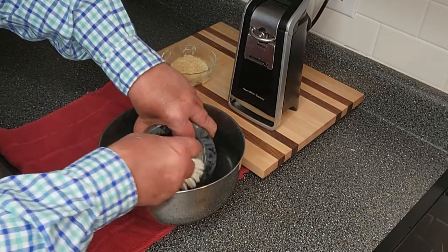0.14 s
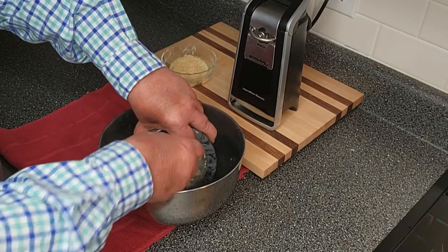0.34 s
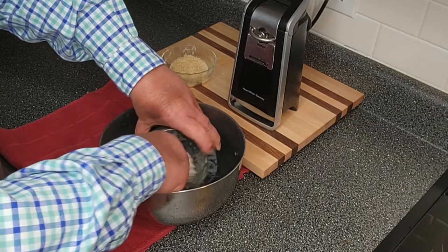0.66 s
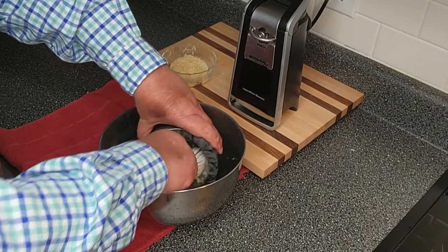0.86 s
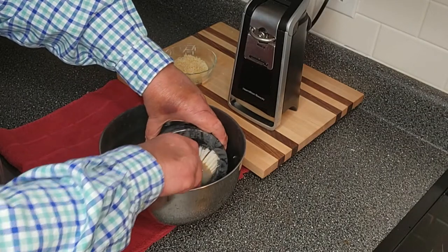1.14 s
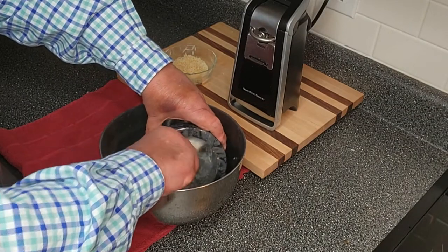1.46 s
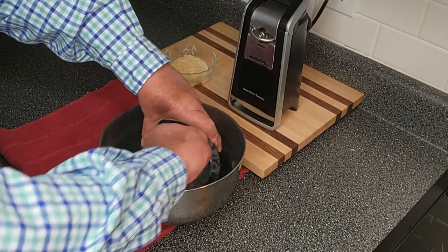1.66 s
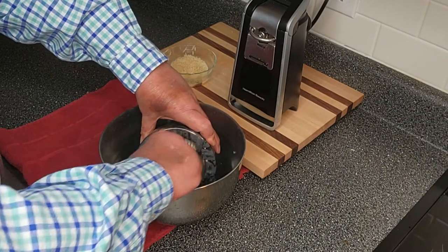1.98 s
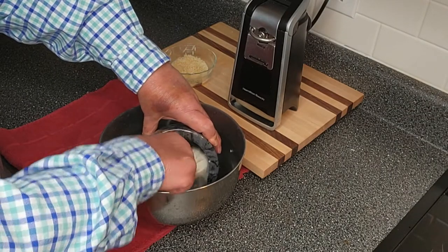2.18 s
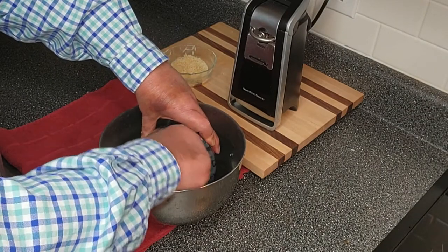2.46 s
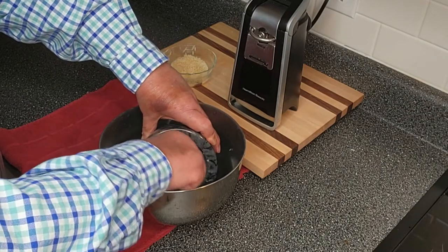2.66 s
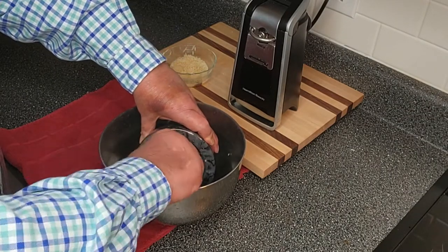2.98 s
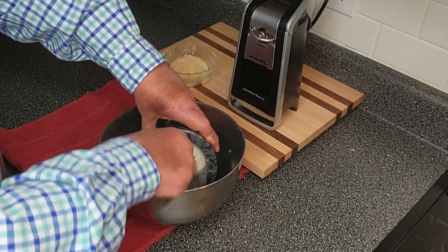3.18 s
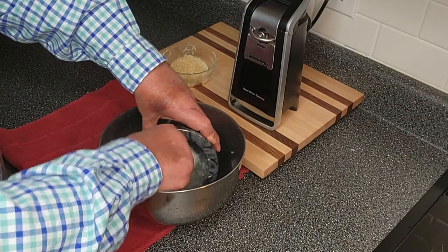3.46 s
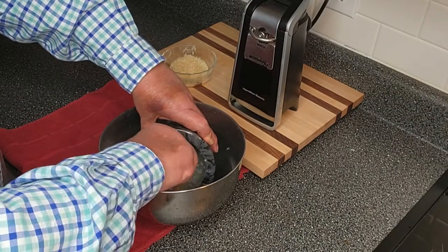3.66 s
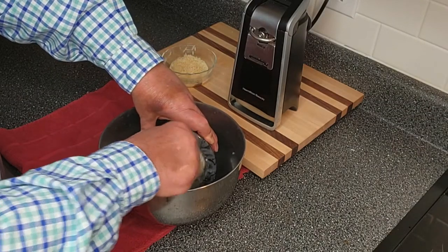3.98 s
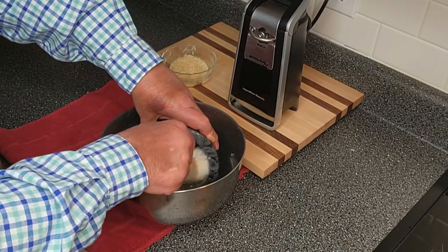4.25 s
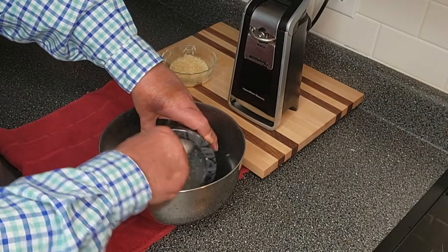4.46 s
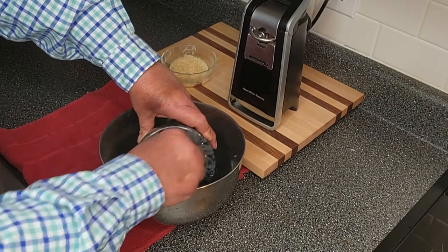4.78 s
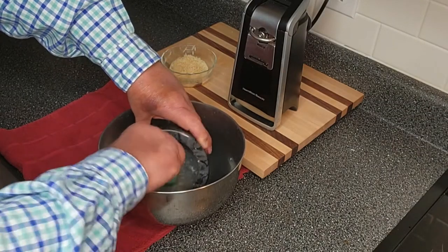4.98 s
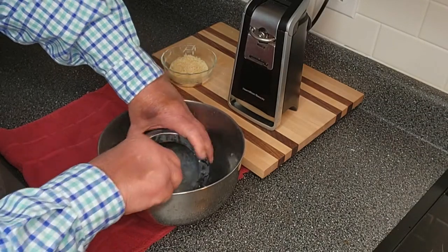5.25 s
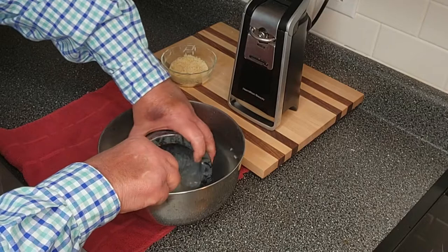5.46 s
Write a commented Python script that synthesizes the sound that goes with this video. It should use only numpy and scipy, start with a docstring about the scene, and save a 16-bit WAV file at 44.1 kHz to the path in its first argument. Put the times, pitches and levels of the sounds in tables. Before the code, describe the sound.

Irregular scratching of bristles on rough stone, broken by ringing taps, small pops and low grinding in a quiet kitchen.

```python
"""Scrubbing a stone bowl

A small tiled kitchen, a stereo microphone at the counter, its left port facing a stone bowl held in a
steel basin. A nylon brush rasps over the rough stone in short strokes and sets the bowl ringing; the
brush head knocks and stiff bristles flick free, and the room answers these two. The bowl grinds and
bumps against the basin and shakes the counter. Short pitched pops and ticks, many on the knocks and
flicks, and a small rising bubble or two sound over the quiet room air."""
import sys
import numpy as np
from scipy import signal
from scipy.fft import rfft, irfft, next_fast_len
from scipy.io import wavfile
from scipy.ndimage import uniform_filter1d

SR = 44100
rng = np.random.default_rng(int(sys.argv[2]) if len(sys.argv) > 2 else 0)


def dump_mix(stems):
    """Bounce the given channels to the path in sys.argv[1] as a 16-bit WAV at rate SR."""
    frames = np.atleast_2d(stems).T  # one column per channel
    limited = np.clip(frames, -1, 1)  # hard clip at full scale
    pcm = np.round(limited * 32767).astype(np.int16)
    wavfile.write(sys.argv[1], SR, pcm)


N = 247842
TIME = np.arange(N) / SR

# Brush strokes: full pressure t/s, rise/s, hold/s, rasp/dB, fizz/dB over rasp, hollow f/Hz,
# hollow/dB over rasp, bent tips/dB over rasp, wall ring/dB, wall f/Hz, rim ring/dB, rim f/Hz, pan/dB
# (pan is always left minus right)
STROKES = [(0.0, 0.065, 0.028, -47.5, -17.0, 3380.0, -17, -18, -49.5, 1270.0, -58, 1630.0, -4),
           (0.114, 0.074, 0.014, -55, -20, 2200.0, -13, -12, -58.5, 1280, -65, 2120, -3),
           (0.151, 0.0063, 0.032, -33, -15, 2250, -14, -14.0, -58, 1200.0, -49, 2400, -5),
           (0.21, 0.03, 0.03, -35.5, -18, 3390, -9.5, -14, -50.5, 1120, -46, 2280, -4),
           (0.332, 0.04, 0.042, -53, -17, 3300, -10, -16, -61.5, 1200, -58.5, 2310.0, -4),
           (0.547, 0.079, 0.033, -43.0, -22, 2500, -30, -14.0, -48.5, 876, -51.0, 2600.0, -4),
           (0.788, 0.067, 0.019, -61, -34, 2480.0, -16, -16, -57.5, 875, -77, 2240, -4),
           (0.905, 0.02, 0.026, -85, -13, 2500, -8, -17, -53, 1210, -62, 2500, -6),
           (0.947, 0.031, 0.0084, -52.5, -10, 2560, 0, -30, -66, 1270, -45.5, 2270, -4),
           (1.051, 0.088, 0.038, -53.5, -9.5, 3420, -8, -29, -59.5, 1120, -59.5, 2050, -2),
           (1.19, 0.055, 0.053, -63, -7, 5050, -7, -19, -63, 920.0, -66.5, 2050, -3),
           (1.397, 0.085, 0.0081, -59, 0.5, 4810.0, -10, -4, -77, 1340, -66, 2670, -4.5),
           (1.536, 0.14, 0.001, -48.5, -1, 4670, -8, -8.5, -58, 1330, -67, 2820.0, -2),
           (1.623, 0.06, 0.052, -49.5, -3, 2180, -20, -12, -53.5, 1190, -60, 2440.0, -3.5),
           (1.689, 0.014, 0.0043, -64, -6, 2400, -12, -10, -52.5, 1220, -50.5, 2390, -2),
           (1.802, 0.028, 0.056, -65.5, -3.5, 4930.0, -14, -14.0, -73, 1340.0, -74, 2460.0, -3.5),
           (1.922, 0.022, 0.027, -52, -7, 3270, -3.5, -25, -66.0, 1310, -56.5, 2050.0, -3),
           (1.998, 0.11, 0.083, -53.5, -7.5, 4170, -16, -18, -58, 1300, -61.0, 1620, -3),
           (2.055, 0.03, 0.028, -61, -6, 3700, -15, 0.5, -62, 1360, -55.5, 1700, -2),
           (2.153, 0.035, 0.08, -56, -3, 2160, -15, -7, -60, 1230, -59.5, 2070, -2.5),
           (2.265, 0.029, 0.062, -59, -0.5, 2180, -15, -9, -64, 1196, -56.5, 2260.0, -3.5),
           (2.57, 0.023, 0.022, -45, -8.5, 4810, -4.5, -12, -57, 1270, -65, 2840, -2.5),
           (2.608, 0.03, 0.011, -55, -22, 3060, 1, -20, -79, 1220, -50.5, 2810, -5),
           (2.701, 0.0065, 0.0079, -54, -23, 3440, -7, -16, -51.0, 980, -56, 2320.0, -7),
           (2.809, 0.031, 0.054, -46, 0.5, 4640, -0.5, -37, -50.5, 1345, -52.5, 1790, -3.5),
           (2.993, 0.039, 0.026, -51.0, -6.5, 3160, -4.5, -25, -60.5, 1235, -54.5, 2820, -4),
           (3.103, 0.068, 0.027, -62, -7.0, 3940, -7, -7, -58.0, 1180, -59, 1740, -3),
           (3.177, 0.11, 0.0068, -51, -2.5, 4040, -10, -14.0, -55.5, 1190, -54, 1860, -4),
           (3.268, 0.15, 0.028, -54.0, -4.5, 2330, -22, -18, -53, 1206, -53, 2094, -4),
           (3.348, 0.054, 0.037, -56.5, -2, 2190, -14, -4, -62.5, 1270, -63, 1890, -1.5),
           (3.468, 0.02, 0.013, -63.5, -7, 3640, -17, -7, -79, 1280.0, -87, 1610.0, -3),
           (3.597, 0.052, 0.059, -51, -6, 2720, -13, -16, -73, 1320, -60.5, 2320, -3.5),
           (3.673, 0.022, 0.012, -59, -13, 3500, -19, -21, -56, 1050, -68, 2200, -3),
           (3.847, 0.014, 0.026, -55.5, -4.5, 4430, -20, -5, -57, 1300, -69, 2760.0, -4),
           (3.871, 0.021, 0.0077, -50, -8, 3960, -24, -21, -53, 1354, -61, 2300, -3),
           (4.003, 0.029, 0.013, -51, -4, 5080.0, -24, -14.0, -58.5, 1300, -58, 2040, -3.5),
           (4.062, 0.02, 0.01, -68, 2, 2830, 0, -18, -77, 1320, -63, 2610, -8),
           (4.135, 0.033, 0.013, -50, -5, 4330, -8, -13, -71, 960.0, -59, 2900, -3.5),
           (4.215, 0.018, 0.01, -62.5, -18, 2150, -14, -16, -76, 905, -56.5, 2160, -5),
           (4.382, 0.082, 0.022, -58.5, -6.5, 2820.0, -12, -12, -73, 1160, -65, 2520, -3),
           (4.456, 0.025, 0.019, -47.5, 1.5, 4900, -6, -5, -55, 1180, -71, 2930, -2),
           (4.589, 0.083, 0.06, -45, -4.5, 4730.0, -21, -8.5, -80, 1231, -52.5, 2960, -3),
           (4.777, 0.039, 0.001, -47.0, -7.5, 4800, -17, -9, -52.5, 1330, -56.0, 2140, -4),
           (4.935, 0.037, 0.025, -45.5, -0.5, 4740.0, -19, -13, -52, 1357, -58, 2000.0, -3.5),
           (5.055, 0.033, 0.0036, -38, -10.5, 3420, -18, -4, -48, 960.0, -49, 2600, -4.5),
           (5.11, 0.04, 0.019, -56.5, -8, 3450, -20, -5, -55, 900, -67, 2340, -2),
           (5.317, 0.0071, 0.019, -67, -27, 5300, -22, 1, -68.5, 1190, -70, 1550.0, -2),
           (5.418, 0.074, 0.022, -62, -25, 3770.0, -22, -7.5, -69.5, 970, -77, 1560.0, -4.5),
           (5.524, 0.0091, 0.018, -60.5, -16, 4950, -20, -9, -91, 1360, -77, 2160.0, -2.5)]
# Brush head on the bowl: t/s, ring peak/dB, f/Hz, t60/s, crack/dB over ring, pan/dB
KNOCKS = [(0.148, -20, 2110, 0.088, -3, -0.5), (0.521, -28.5, 870, 0.034, -31, 2.5),
          (0.532, -27.5, 920, 0.083, -1, -3.5), (0.753, -50, 870, 0.047, -35, -9),
          (0.906, -50, 1230, 0.038, -28, -10), (1.233, -42.5, 880, 0.031, -33, -8),
          (1.379, -45, 1300, 0.11, -25, 0.0), (1.61, -36.5, 810, 0.11, -24, -1),
          (1.688, -29.5, 2280, 0.07, -24, -2.5), (2.32, -50, 544, 0.041, -20, -2),
          (2.449, -49, 920, 0.04, -30, -4), (2.699, -40.5, 1010, 0.069, 4, -3.5),
          (2.701, -34.5, 475, 0.036, -30, -2), (2.734, -35, 870, 0.047, -16, 1),
          (2.785, -41, 414, 0.04, -11, -2), (2.798, -26, 1240, 0.043, -30, -2),
          (3.282, -42, 1150, 0.04, -20, -2), (3.405, -26.5, 1186, 0.034, -36, -3),
          (3.656, -46, 1010, 0.032, -27, -2), (4.069, -41, 3000, 0.037, -11, -2),
          (4.145, -38, 850, 0.068, -18, 2), (4.15, -38.5, 500, 0.06, -25, 1),
          (5.054, -31.5, 3830, 0.045, 4.5, -2.5), (5.074, -24.5, 3380, 0.027, -28, 1.5),
          (5.42, -48, 1000, 0.14, -28, -1.5)]
# Bristles flicking free: t/s, level/dB, f/Hz, t60/s, pan/dB
FLICKS = [(0.43, -53.5, 8850, 0.047, 3.0), (0.496, -36, 6200, 0.045, -4), (1.2426, -34.5, 9150, 0.024, -1),
          (1.3984, -42.5, 5800, 0.033, 4), (1.7968, -42, 5430, 0.018, -6), (2.092, -43.5, 6400, 0.053, -6),
          (2.218, -48.5, 10400, 0.046, -19), (2.275, -49, 7650, 0.038, 1), (2.4398, -46.5, 7650, 0.05, -2),
          (3.839, -53, 5100, 0.041, 2), (4, -43, 6230, 0.064, -5), (4.444, -39.5, 5330, 0.17, -2),
          (4.641, -26.5, 4900, 0.033, -2), (4.771, -37, 4500, 0.077, 2), (4.8366, -50, 6850, 0.04, -12),
          (4.931, -36, 8040, 0.033, -3), (5.3193, -58, 7200, 0.094, -11), (5.5226, -42, 5100, 0.011, -12)]
# Hands shoving the bowl against the basin: full weight t/s, rise/s, hold/s, grind/dB, drum/dB, sway/dB
SHOVES = [(0.0, 0.043, 0.065, -58, -64.5, -74), (0.157, 0.027, 0.062, -47, -37, -41.5),
          (0.347, 0.029, 0.062, -65.5, -56.0, -66), (0.563, 0.079, 0.012, -49, -46, -46.5),
          (0.781, 0.13, 0, -59.5, -67, -79.0), (0.907, 0.016, 0.022, -62.5, -64.5, -63.5),
          (1.09, 0.27, 0.026, -65.5, -65.5, -71), (1.257, 0.05, 0.0043, -71, -70, -67),
          (1.379, 0.032, 0.046, -70.0, -65, -68), (1.62, 0.19, 0.099, -63, -58.0, -62.5),
          (1.886, 0.24, 0.0071, -70, -63, -69), (2.104, 0.094, 0.14, -66.5, -68, -72),
          (2.193, 0.04, 0, -76, -68, -70), (2.333, 0.27, 0.076, -67, -65.5, -68.0),
          (2.456, 0.03, 0.0036, -68.5, -68, -76), (2.585, 0.074, 0.028, -64.5, -60, -59.5),
          (2.702, 0.0081, 0, -58, -52, -55), (2.801, 0.061, 0, -46.5, -56, -57),
          (3.22, 0.33, 0.17, -72, -69.0, -68.5), (3.41, 0.03, 0.034, -56, -55.5, -54.0),
          (3.666, 0.018, 0.019, -67.5, -67, -82), (3.934, 0.112, 0.15, -67, -63.5, -64.5),
          (4.143, 0.021, 0.022, -54.5, -58.0, -61), (4.444, 0.13, 0.051, -66, -68, -69.5),
          (4.92, 0.17, 0.017, -57.5, -63.0, -67), (5.057, 0.032, 0.041, -49, -44, -46),
          (5.176, 0.014, 0.096, -67, -76, -71), (5.429, 0.085, 0.014, -61, -58.5, -62)]
# Pitched pops and ticks, bubbles near 4.2 s: t/s, level/dB, start f/Hz, pitch factor per length, length/s
POPS = [(.519, -32, 915, 1.02, .012), (.772, -46, 830, 1.01, .012), (.935, -44, 2600, .96, .008),
        (.948, -41, 2250, 1.0, .012), (1.232, -47, 900, 1.02, .008), (1.609, -37, 830, 1.02, .012),
        (2.615, -41, 2900, 1.01, .012), (3.005, -46, 3000, 1.01, .015), (3.835, -44, 5100, 1.0, .004),
        (4.068, -43, 2850, 1.01, .005), (4.211, -44, 2050, 1.07, .009), (4.232, -55, 2700, 1.12, .006),
        (4.83, -50, 1320, 1.02, .008), (5.521, -41, 4850, 1.0, .004)]
# Bowl bumping the basin: t/s, level/dB, favoured f/Hz
BUMPS = [(0, -57, 1600), (.149, -68, 2500), (.532, -76, 2500), (2.799, -76, 1300), (5.055, -72, 900)]

# Noise spectra: f/Hz, level/dB
RASP_SPECTRUM = [(880, -43), (1500, -14), (2260, -10), (2560, -13), (2850, -5), (4220, -2), (4670, -2.5),
                 (5280, -4), (7590, -9), (9500, -31.5), (12400, -35), (20900, -120)]  # bristles on stone
FIZZ_SPECTRUM = [(6000, -17.5), (9000, 4), (12000, 3), (14500, 5.5), (15900, 1), (16500, -25)]  # their finest hiss
GRIND_SPECTRUM = [(82, -59), (140, -7), (156, -5), (242, -1.5), (319, -8), (434, -1), (760, -7.5),
                  (800, -2), (1040, -18), (1760, -120)]  # stone on the basin
CRACK_SPECTRUM = [(120, -35), (200, -0.5), (735, -23.5), (1770, -13), (2170, -3), (2700, -4.5),
                  (3690, -3.5), (4600, -9.5), (7970, -4.5), (10300, -34), (16000, -25)]  # the edge of a knock
AIR_SPECTRUM = [(18, -32), (30, 10.5), (108, 10.5), (164, -6), (325, -17), (750, -18), (1270, 1.5),
                (1830, -17), (2250, -10), (4810, -22), (7900, -13), (10300, -35), (15600, -20)]  # the quiet kitchen
# Modes of bowl and counter: f/Hz, width/Hz, level/dB
BOWL_MODES = [(497, 22, -8), (764, 61, -4.5), (859, 21, -13), (969, 68, 4.5), (1115, 98, 3),
              (1231, 73, -1.5), (1288, 35, -2.5), (1552, 91, 2.5), (1913, 44, -6), (2003, 50, -5.5),
              (2211, 20, -5.5), (2425, 20, -4.5), (2697, 22, -2), (2950, 50, -2.5), (3270, 60, -35),
              (3320, 190, 4), (3550, 60, -2.5), (3650, 44, -15), (3980, 35, -21), (5070, 67, -1)]
COUNTER_MODES = [(51.9, 11.1, 4.5), (70.5, 15.9, -2.5), (92.1, 12.76, -2), (122.4, 14.23, -0.5),
                 (160.4, 17.7, -11), (181.7, 8, -15.5), (234, 24.7, -13.5), (260.1, 15.2, -13.5)]
# Modes of the steel basin: f/Hz, level/dB, t60/s
BASIN_MODES = [(875, 2, 0.54), (1287, 4, 0.27), (1575, 7.5, 0.088), (1970, -3, 0.28), (2330, -40, 0.4),
               (2240, -19, 0.89), (3170, -3, 0.95), (3150, -9, 0.47), (3640, 9, 0.35), (3720, -15, 0.65)]
# Decay of the tiled room: f/Hz, t60/s
ROOM_DECAY = [(200, 0.38), (1000, 0.42), (4000, 0.34), (12000, 0.21)]
# How alike the microphone's two ports hear: f/Hz, likeness from 0 to 1
PORT_LIKENESS = [(60, 0.51), (180, 0.75), (550, 0.72), (1650, 0.22), (4970, 0.2), (15000, 0.0)]
# The left port faces the bowl: f/Hz, pan/dB
PORT_BALANCE = [(60, -1.5), (240, -0.5), (950, -1), (3770, 3), (9000, 4.5), (15000, 9.5)]
# Floor between strokes and shoves, by layer (rasp, fizz, wall, rim, grind, drum, sway): level/dB
REST_DB = {"rasp": -74, "fizz": -79.5, "wall": -75.5, "rim": -86, "grind": -118, "drum": -76, "sway": -74.5}

LIFT_DB_PER_S = {"rasp": 201, "fizz": 234, "hollow": 300, "wall": 206, "rim": 243}  # the brush lifts
SETTLE_DB_PER_S, SWAY_SETTLE_DB_PER_S = 140, 172  # the bowl settles
DRUM_LAG_S, SWAY_LAG_S = 0.0091, 0.033  # the counter answers late
BENT_TIPS_HZ, LOW_CUT_HZ, HIGH_CUT_HZ = 7900, 38, 16050
CREST_DB = 4.5  # peak of a noisy snap over its rms
ROOM_DB, AIR_DB = -7.5, -66.5
STEP = 64  # samples per control value


def brush():
    """Bristles rasp on the stone; the hollow under the hand and the bent tips each lift a band."""
    rasp_db, fizz_db, hollow_hz, hollow_db, bent_db = np.transpose(STROKES)[3:8]
    pan_db = np.transpose(STROKES)[12]
    pressed, cupped, fizzing = (swells(STROKES, LIFT_DB_PER_S[k]) for k in ("rasp", "hollow", "fizz"))
    hollow_hz = per_sample(leading(cupped, rasp_db + hollow_db, hollow_hz))  # the grip shifts
    tips = slips(per_s=10000, spread_db=2.1) * gain_of(1.6 * drift(300))  # tufts pass in bunches
    crackle = slips(per_s=400, spread_db=2.5)  # a few stiff bristles
    tips = rough_stone(tips + .22 * crackle, depth_db=3, bins=3, frames=7)
    layers = [(level(pressed, rasp_db, REST_DB["rasp"]), coloured(tips, RASP_SPECTRUM)),
              (level(cupped, rasp_db + hollow_db, -90), band(tips, hollow_hz, width_hz=600)),
              (level(pressed, rasp_db + bent_db, -90), band(tips, BENT_TIPS_HZ, width_hz=2600)),
              (level(fizzing, rasp_db + fizz_db, REST_DB["fizz"]), coloured(tips, FIZZ_SPECTRUM))]
    sound = sum(per_sample(envelope) * noise for envelope, noise in layers)
    return sides(per_sample(leading(pressed, rasp_db, pan_db))) * sound


def slips(per_s, spread_db):
    """Catching and slipping on the stone's grains: uneven clicks, heard in both ports."""
    size = gain_of(spread_db * np.minimum(rng.exponential(1, (2, N)), 5)) * rng.standard_normal((2, N))
    return unit_rms(paired(size * (rng.random((2, N)) < per_s / SR)))


def rough_stone(x, depth_db, bins, frames):
    """Each spot of the stone favours its own narrow bands for a moment."""
    spectra = signal.stft(x, nperseg=512)[2]
    patches = uniform_filter1d(rng.standard_normal(spectra.shape[1:]), bins, axis=0)
    patches = unit_rms(uniform_filter1d(patches, frames, axis=1))
    return unit_rms(signal.istft(spectra * gain_of(depth_db * patches), nperseg=512)[1][:, :N])


def bowl_ring():
    """Rubbing rings the bowl's modes, most those near the pitch of wall and rim under the brush."""
    wall_db, wall_hz, rim_db, rim_hz = np.transpose(STROKES)[8:12]
    tips = slips(per_s=5000, spread_db=4)
    mode_hz, _, mode_db = np.transpose(BOWL_MODES)[:, :, None]
    weights = 0
    for spot, spot_db, spot_hz in ("wall", wall_db, wall_hz), ("rim", rim_db, rim_hz):
        shapes = swells(STROKES, LIFT_DB_PER_S[spot])
        centre_hz = leading(shapes, spot_db, spot_hz)
        share = gain_of(mode_db) * near(mode_hz, centre_hz, .4, 20) * near(mode_hz, centre_hz, .08, 8)
        weights += level(shapes, spot_db, REST_DB[spot]) * share / np.linalg.norm(share, axis=0)
    return sum(per_sample(weight) * unit_rms(ring_at(ring_at(tips, hz, width), hz, 6 * width))
               for (hz, width, _), weight in zip(BOWL_MODES, weights))


def knocks():
    """The brush head's hard tap and its chatter ring the bowl's modes under a short crack."""
    out, t = np.zeros((2, N)), TIME[:SR // 5]
    for start, db, hz, t60, crack_db, pan_db in KNOCKS:
        burst = paired(rng.standard_normal((2, len(t))))
        fading = gain_of(-60 * t / t60)
        chatter = .15 * burst * fading
        chatter[:, :12] += np.hanning(12) / 4  # the tap is a short rounded push
        ring = 2.4 * ring_at(chatter, hz, .1 * hz) / (.08 * hz)
        for mode_hz, width, mode_db in BOWL_MODES:
            mode = ring_at(chatter, mode_hz, 2.5 * width) / (5 * width)
            ring += gain_of(mode_db) * near(mode_hz, hz, octaves=.7, boost_db=8) * mode
        envelope = (fading + .8 * np.exp(-t / .003)) * np.minimum(t / .001, 1)
        crack = gain_of(crack_db - CREST_DB) * envelope * coloured(burst, CRACK_SPECTRUM)
        add(out, start, gain_of(db) * sides(pan_db)[:, None] * (ring / abs(ring).max() + crack))
    return out


def flicks():
    """Stiff bristles spring free with a brief high snap."""
    out, t = np.zeros((2, N)), TIME[:SR // 5]
    for start, db, hz, t60, pan_db in FLICKS:
        burst = paired(rng.standard_normal((2, len(t))))
        snap = unit_rms(ring_at(burst, hz, .15 * hz))
        snap += .3 * coloured(burst, RASP_SPECTRUM) + .45 * coloured(burst, FIZZ_SPECTRUM)
        envelope = gain_of(db - CREST_DB - 60 * t / t60) * np.minimum(t / .0012, 1)
        add(out, start, envelope * sides(pan_db)[:, None] * snap)
    return out


def bowl_grind():
    """The heavy stone grinds dully against the basin at each shove."""
    envelope = level(swells(SHOVES, SETTLE_DB_PER_S), np.transpose(SHOVES)[3], REST_DB["grind"])
    return per_sample(envelope) * coloured(slips(per_s=2000, spread_db=1), GRIND_SPECTRUM)


def counter():
    """The basin rocks and drums the counter's low modes, whose pitch and strength waver."""
    drum_db, sway_db = np.transpose(SHOVES)[4:]
    drum = per_sample(level(swells(SHOVES, SETTLE_DB_PER_S, DRUM_LAG_S), drum_db, REST_DB["drum"]))
    sway = per_sample(level(swells(SHOVES, SWAY_SETTLE_DB_PER_S, SWAY_LAG_S), sway_db, REST_DB["sway"]))
    out = np.zeros((2, N))
    for hz, width, db in COUNTER_MODES:
        cycles = np.cumsum(hz + .5 * width * drift(924)) / SR
        right_offset = np.array([[0], [.04]]) * drift(2900)
        strength = (sway if hz < 80 else drum) * gain_of(db + 2.5 * drift(900))
        out += strength * np.sin(2 * np.pi * (cycles + right_offset + rng.random()))
    return out


def pops():
    """Short pitched pops and ticks, many on knocks and flicks, and a small rising bubble or two."""
    out = np.zeros((2, N))
    for start, db, hz, glide, length in POPS:
        age = np.arange(0, 3 * length, 1 / SR) / length
        envelope = 2 * np.sqrt(age) * np.exp(-1.8 * age)
        note = envelope * np.sin(2 * np.pi * np.cumsum(hz * glide ** age) / SR)
        add(out, start, gain_of(db) * np.array([note, note]))
    return out


def basin():
    """The steel rings thinly after each bump of the bowl, tapering out within half a second."""
    out, t = np.zeros((2, N)), TIME[:SR // 2]
    for start, db, centre_hz in BUMPS:
        for hz, mode_db, t60 in BASIN_MODES:
            ring = np.sin(2 * np.pi * (hz * t + .35 * rng.random((2, 1))))
            envelope = gain_of(db + mode_db - 60 * t / t60) * (1 - 2 * t)
            add(out, start, envelope * near(hz, centre_hz, octaves=.4, boost_db=14) * ring)
    return out


def tiled_room(x):
    """Reflections off the tiles: sparse taps of random sign, each band dying at its own speed."""
    taps = np.zeros((2, SR // 2))
    slots = np.arange(200, SR // 2 - 20, 20)
    arrivals = slots + rng.integers(0, 20, (2, len(slots)))
    np.put_along_axis(taps, arrivals, rng.choice([-1., 1.], arrivals.shape), axis=1)
    hz, t, spectra = signal.stft(taps, SR, nperseg=256)
    decay = gain_of(-60 * t / curve_at(ROOM_DECAY, hz)[:, None])
    tail = signal.istft(spectra * decay, SR, nperseg=256)[1]
    return signal.fftconvolve(x, tail / np.linalg.norm(tail[0]), axes=1)[:, :N]


def room_air():
    """The kitchen's steady room tone: low rumble and faint hiss."""
    return gain_of(AIR_DB) * coloured(paired(rng.standard_normal((2, N))), AIR_SPECTRUM)


def gain_of(db):
    """Decibels to a factor."""
    return 10 ** (np.asarray(db) / 20)


def unit_rms(x):
    """Scales to rms 1."""
    return x / np.sqrt(np.mean(x ** 2) + 1e-20)


def curve_at(points, hz):
    """Reads a curve on a log-frequency axis."""
    f, value = np.transpose(points)
    return np.interp(np.log(hz + 1), np.log(f + 1), value)


def sides(pan_db):
    """Left and right gains."""
    return gain_of(np.array([pan_db, -pan_db]) / 2)


def add(mix, start_s, sound):
    """Mixes a stereo sound in at a time."""
    part = mix[:, round(start_s * SR):][:, :sound.shape[1]]
    part += sound[:, :part.shape[1]]


def coloured(x, spectrum):
    """Filters by a spectrum, rms 1."""
    size = next_fast_len(x.shape[-1])
    gains = gain_of(curve_at(spectrum, np.fft.rfftfreq(size, 1 / SR)))
    return unit_rms(irfft(rfft(x, size) * gains, size)[..., :x.shape[-1]])


def paired(noises):
    """Makes two independent noises as alike as the microphone's ports hear them."""
    size = next_fast_len(noises.shape[1])
    likeness = curve_at(PORT_LIKENESS, np.fft.rfftfreq(size, 1 / SR))
    left, other = rfft(noises, size)
    right = likeness * left + np.sqrt(1 - likeness ** 2) * other
    return irfft(np.array([left, right]), size)[:, :noises.shape[1]]


def band(x, hz, width_hz):
    """A band whose centre may move, rms 1: twice shifts hz down to zero, smooths and shifts back."""
    carrier = np.exp(2j * np.pi * np.cumsum(hz * np.ones(N)) / SR)
    pole = np.exp(-np.pi * width_hz / SR)
    for _ in range(2):
        x = 2 * (carrier * signal.lfilter([1 - pole], [1, -pole], x / carrier + 1e-18)).real
    return unit_rms(x)


def ring_at(x, hz, width_hz):
    """A resonance of steady pitch."""
    return signal.lfilter(*signal.iirpeak(hz, hz / width_hz, SR), x)


def near(hz, centre_hz, octaves, boost_db):
    """Gain favouring the modes close to a centre frequency."""
    return gain_of(boost_db * np.exp(-(np.log2(hz / centre_hz) / octaves) ** 2))


def drift(samples):
    """Slow random wander, rms 1."""
    return unit_rms(uniform_filter1d(uniform_filter1d(rng.standard_normal(N), samples), samples))


def swells(events, fall_db_per_s, lag_s=0):
    """Rise, hold and release of each event, as gains at control rate; a rise gains 20 dB."""
    full_at, rise, hold = np.transpose(events)[:3, :, None]
    t = TIME[::STEP] - lag_s - full_at
    return gain_of(np.minimum(20 * t / rise, 0) - fall_db_per_s * np.maximum(t - hold, 0))


def level(shapes, db, rest_db):
    """Amplitude of overlapping events and a resting floor, summed by power."""
    return np.sqrt(((shapes * gain_of(db)[:, None]) ** 2).sum(axis=0) + gain_of(rest_db) ** 2)


def leading(shapes, db, value):
    """The value of the event loudest at each moment, shifting quickly."""
    return uniform_filter1d(value[(shapes * gain_of(db)[:, None]).argmax(axis=0)], size=6)


def per_sample(control):
    """A control value for every sample."""
    return np.interp(TIME, TIME[::STEP], control)


def scene():
    """The work at the counter over the room tone; only knocks and flicks get the room's tail."""
    struck = knocks() + flicks()
    background = room_air() + gain_of(ROOM_DB) * tiled_room(struck)
    return background + struck + pops() + basin() + brush() + bowl_ring() + bowl_grind() + counter()


def record(dry):
    """The stereo microphone: brighter on the left, with the deepest bass and highest treble cut."""
    size = next_fast_len(N)
    hz = np.fft.rfftfreq(size, 1 / SR)
    low_cut = 1 / np.sqrt(1 + (LOW_CUT_HZ / (hz + 1)) ** 8)
    heard = irfft(rfft(dry, size) * sides(curve_at(PORT_BALANCE, hz)) * low_cut, size)[:, :N]
    high_cut = signal.firwin(511, HIGH_CUT_HZ, window=("kaiser", 9), fs=SR)
    return signal.oaconvolve(heard, high_cut[None], "same")


dry = scene()
out = record(dry)
dump_mix(out)
```